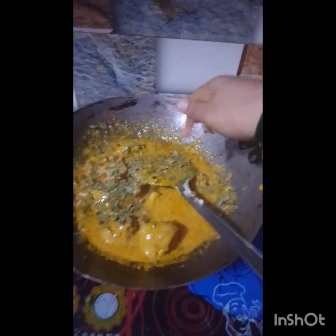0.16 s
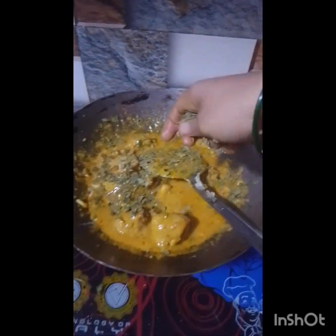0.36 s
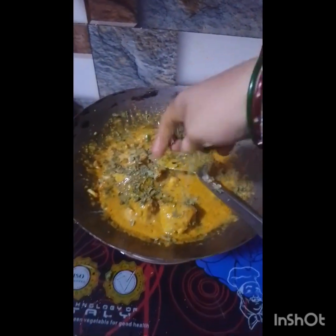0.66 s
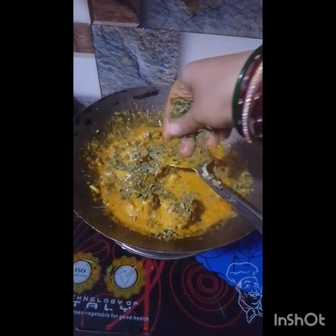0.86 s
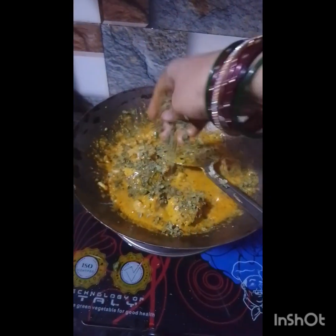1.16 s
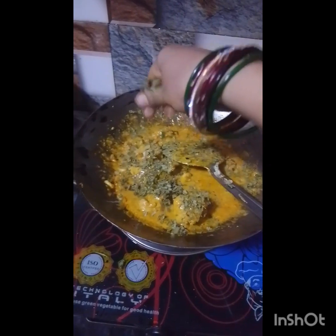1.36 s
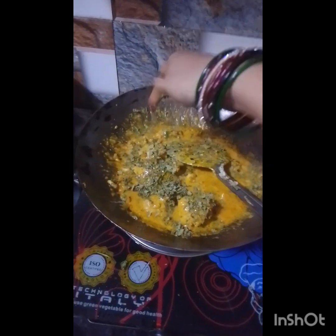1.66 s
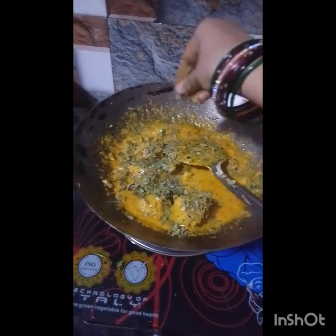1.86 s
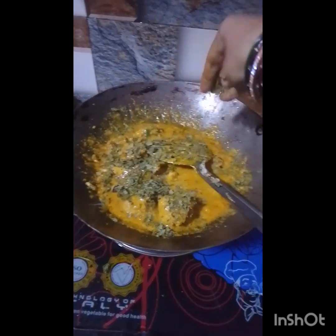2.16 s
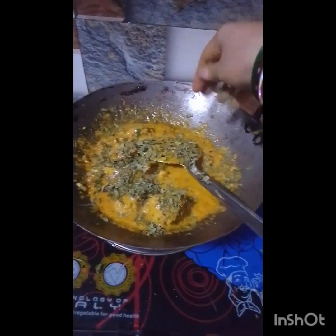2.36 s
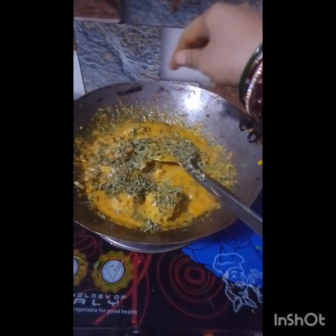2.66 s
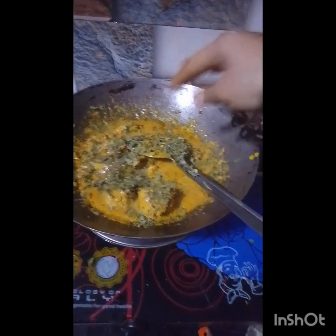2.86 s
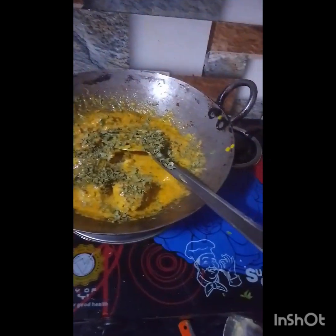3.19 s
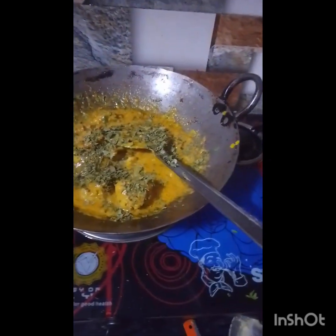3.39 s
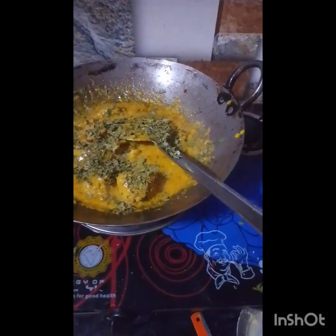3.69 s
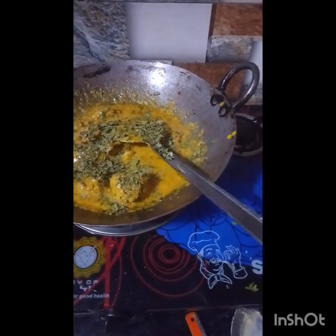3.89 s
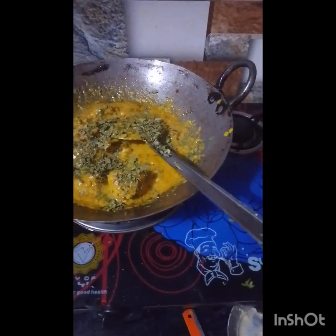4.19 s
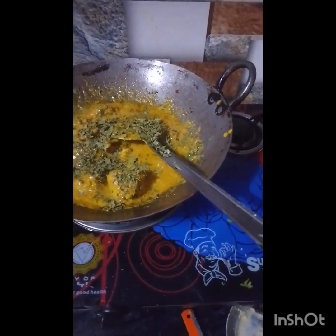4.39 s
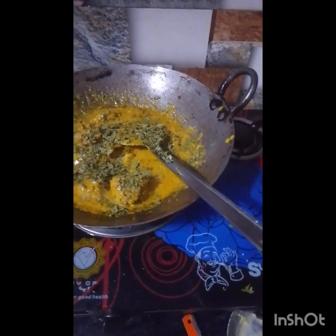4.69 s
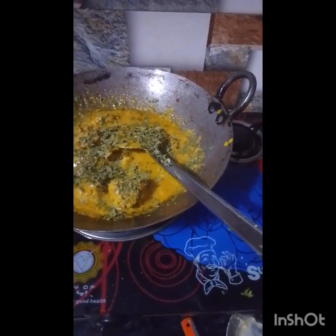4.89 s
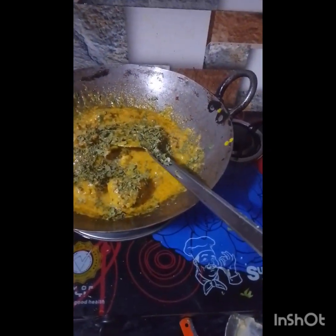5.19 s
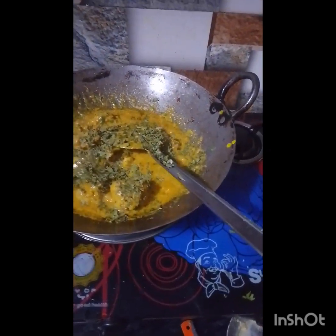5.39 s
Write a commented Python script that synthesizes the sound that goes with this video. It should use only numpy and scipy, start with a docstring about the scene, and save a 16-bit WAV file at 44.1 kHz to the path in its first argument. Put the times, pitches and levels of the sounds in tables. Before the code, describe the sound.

Heard close above the pan in a small tiled kitchen, with a short bright echo. Throughout, an induction cooktop's motor hums at about 83 and 166 hertz, the lower tone throbbing two or three times a second, the pitch sagging very slightly. Fan air rushes softly around it, mostly low and dull. Curry simmers with a very faint high sizzle, tiny crackles and several little pops each second. From 0 to about 2.5 seconds, dried herbs are crumbled in soft, dry, overlapping rustles. Bangles touch faintly at 2.1, slide with a brief bright rub near 2.9, and chink again around 3.05 and 3.5. Kitchenware clicks sharply at 3.6 to 3.7, then rattles in a quick cluster at 3.8 to 3.9. The loudest knock, a hard clack with a woody thud and short ring, lands at 4.17; a lesser one follows at 5.08. Hum and simmer continue to the end at 5.5.

```python
"""A motor hums in an induction cooktop: two strong tones and weaker lines locked to one drifting speed.
Around it a fan rushes (shaped noise), and a pan of curry sizzles (noise), crackles (tiny clicks)
and pops (short noise bursts). Dried herbs rustle (clumps of clicks), and the cook's bangles chink
(ringing tones and a rub of noise). Kitchenware knocks nearby with click, thud and ring,
in a small tiled kitchen made from fading noise."""
import sys
import numpy as np
from scipy import signal
from scipy.fft import rfft, irfft, next_fast_len
from scipy.io import wavfile
from scipy.ndimage import map_coordinates

SR = 44100
rng = np.random.default_rng(int(sys.argv[2]) if len(sys.argv) > 2 else 0)


def to_wav(s):
    """Save 16-bit WAV."""
    ch = np.atleast_2d(s).T  # columns
    pcm = np.round(np.clip(ch, -1, 1) * 32767)  # PCM
    wavfile.write(sys.argv[1], SR, pcm.astype(np.int16))


N = 244640  # length in samples

# the kitchen's echo, dying faster at high pitch: f/Hz, time to fall 60 dB/s
KITCHEN_DECAY = [(250, 0.45), (1200, 0.25), (3000, .23), (6000, 0.17), (12000, 0.15)]
# colour of the air through the fan: f/Hz, relative level/dB
AIR_COLOUR = [(25, -8), (55, -12), (78, 6), (102, -1.5), (122, 3), (155, 5), (195, -6), (400, -6),
              (700, -2.5), (950, -7.5), (1500, -6.5), (2500, -8.5), (3000, -12.5), (4500, -13.5),
              (6200, -27), (7400, -40.5)]
# resonances of the cooktop's housing: f/Hz, width/Hz, lift/dB
HOUSING_RESONANCES = [(303, 70, 12.5), (560, 104, 4), (4400, 750, 1.1)]
# colour of the fine sizzle at the pan's rim: f/Hz, relative level/dB
SIZZLE_COLOUR = [(3000, -20), (6000, -2.5), (8000, -4), (10000, 0.5), (11000, -3), (12200, -12),
                 (13200, -20), (15500, -28)]
# colour of the tiny bursts in the hot oil: f/Hz, relative level/dB
CRACKLE_COLOUR = [(800, -8), (2000, -2.5), (4300, 3), (6000, -13.5), (7500, -23.5), (10500, -27.5),
                  (13000, -54)]
# the largest bubbles bursting in the sauce: t/s, relative level/dB, f/Hz
LARGE_POPS = [(.435, -24, 2430), (.784, -26, 2480), (2.1066, -25.5, 4030), (3.3323, -22, 2440),
              (4.108, -24, 2700), (4.1472, -26, 2250)]
# colour of the rustling dry leaves: f/Hz, relative level/dB
LEAF_COLOUR = [(1500, -5), (4200, 11.5), (6000, 3.5), (7500, -6.5), (10000, -3), (11000, -7), (12200, -19),
               (13200, -17), (15500, -25)]
# pinches of dried herbs crumbled between the fingers: t of the crest/s, level/dB
HERB_PINCHES = [(.07, -54), (.26, -60), (.42, -54), (.82, -53), (.97, -58), (1.19, -53), (1.42, -57),
                (1.94, -59), (2.28, -55.5)]
# bangle touches: t/s, level/dB
BANGLE_TOUCHES = [(2.128, -55), (2.893, -48), (3.047, -56), (3.506, -49.5), (3.576, -54)]
# tones a bangle rings with: f/Hz, relative level/dB, time to fall 60 dB/s
BANGLE_MODES = [(4350, -2, .15), (4930, 1, 0.15), (8349, -8, 0.087), (9470, 2, 0.071), (9500, -13, 0.089),
                (12180, -22, .1), (13490, -19, .1), (15200, -20, .1)]
# colour of bangles rubbing: f/Hz, relative level/dB
RUB_COLOUR = [(8000, -31), (9500, -3), (10000, 4), (10700, -2), (11400, -21), (13000, -40)]
# kitchenware knocks: t/s, click level/dB, thud level/dB, ring level/dB
WARE_KNOCKS = [(3.621, -25, -51, -36), (3.6254, -25, -48, -29.5), (3.692, -35.5, -60, -41.5),
               (3.8191, -26.5, -53, -31), (3.834, -30, -58, -32.5), (3.861, -28, -58, -33),
               (3.872, -26, -62, -32), (4.1738, -18, -18.5, -29.5), (5.0798, -24.5, -27, -33)]
# tones the kitchenware rings with: f/Hz, relative level/dB, time to fall 60 dB/s
WARE_MODES = [(1024, -23, 0.11), (1378, 2.5, 0.053), (1600, -5, 0.12), (1936, -33, 0.099), (2180, -4, 0.15),
              (2585, 1.5, 0.1), (2730, -2, 0.069), (3270, -6, 0.17), (3503, -2, 0.12), (3810, -0.5, 0.064),
              (5560, -4, 0.079), (5960, -3, 0.048), (6230, -2, 0.043)]
# low tones of the struck counter: f/Hz, relative level/dB, time to fall 60 dB/s
COUNTER_MODES = [(264, 1, 0.092), (313, 1, 0.12), (352.3, 4, 0.12), (380, -12, 0.083), (468, -1.5, 0.11),
                 (536, -2.5, 0.13), (635, -3, 0.16), (722, -6, 0.2), (885, -6, 0.12), (1026, -13, 0.15),
                 (1250, -15, 0.22), (1384, -7, 0.25), (2000, -7, 0.12)]
# colour of the hard click: f/Hz, relative level/dB
CLICK_COLOUR = [(200, -13), (800, -6.5), (1400, -1), (2000, -5.5), (3000, 1), (4700, -8.5), (6200, -8),
                (7800, -22), (10500, -23), (12000, -35), (13000, -50), (15500, -52)]
# colour of the counter's thud: f/Hz, relative level/dB
THUD_COLOUR = [(120, -30), (210, -17), (260, -3), (340, 0), (450, -6), (680, -7), (900, -9), (1400, -3),
               (2100, -6), (3000, -13), (5000, -64)]
# the motor's turning rate: t/s, f/Hz
MOTOR_SPEED = [(0, 83.37), (1, 83.31), (2, 83.05), (3, 82.74), (4, 82.53), (5.55, 82.76)]
# slow swell of the two strong tones, before their quicker changes:
# t/s, first tone level/dB, second tone level/dB
HUM_SWELL = [(0, -39.5, -34), (.6, -40, -36), (.73, -46.5, -36), (.88, -36, -35.5), (1.15, -35.5, -34.5),
             (1.45, -37.5, -36), (1.95, -36, -37.5), (2.3, -39.5, -34.5), (3.2, -39, -35), (3.55, -36, -34),
             (4.2, -37.5, -33), (4.85, -36, -35.5), (5.05, -42, -32.5), (5.3, -36.5, -33),
             (5.55, -38.5, -36)]
# throbbing of the first tone: f of the beat/Hz, depth/dB, t of a crest/s
HUM_BEATS = [(2.08, 1.5, 0.53), (3.06, 1.46, 0.555)]
# weaker motor lines, level before wavering: multiple of the turning rate, level/dB
MOTOR_LINES = [(1.483, -52.5), (1.733, -56.5), (3, -52), (3.5, -59.5), (5.217, -61.5), (7, -56)]

FAN_DB, SIZZLE_DB, CRACKLE_DB = -39, -72, -54  # middle levels; crackle before its echo
SMALL_POP_RATE = 4.8  # bubbles a second
SMALL_POP_DB = -33  # middle level on the same relative scale as the large pops
SMALL_POP_HZ, SMALL_POP_OCTAVES = 2640, 0.54  # middle pitch, spread either way
PINCH_RISE_S, PINCH_RELEASE_S = 0.42, 0.63  # time to rise or fall by 60 dB
SLIDE_S, SLIDE_DB = 2.864, -47  # one slide of the bangles down the wrist
REBOUND_S, REBOUND_DB = 0.015, -2  # delay and change of level
SCRAPE_DB = -12  # rub within a touch, relative to its ring
SETTLE_S = 0.0045  # delay from a piece's edge landing to its settling flat
SETTLE_CLICK_DB, SETTLE_THUD_DB, SETTLE_RING_DB = -6.5, 3, 4  # changes of level
TOP_HZ, OFFSET = 15500, 0.0067  # upper band limit, steady shift of the waveform


def amp(db):
    """Turn decibels into gain."""
    return 10 ** (np.asarray(db) / 20)


def unit(x):
    """Scale to an rms (average strength) of 1."""
    return x / np.sqrt(np.mean(x ** 2) + 1e-20)


def along(points, hz):
    """Read (frequency, value) points on a log frequency axis."""
    f, v = np.transpose(points)
    return np.interp(np.log(hz + 1), np.log(f + 1), v)


def curves(rows):
    """Draw one value per sample for each column after the time."""
    s, *cols = np.transpose(rows)
    return [np.interp(np.arange(N) / SR, s, c) for c in cols]


def wobble(rate):
    """Draw a smooth random curve through `rate` random points a second."""
    knots = np.random.default_rng(rng.integers(2 ** 31)).standard_normal(int(N * rate / SR) + 4)
    return map_coordinates(knots, [np.arange(N) * rate / SR])


def filtered(x, gain):
    """Pass x through a gain that depends on frequency."""
    m = next_fast_len(len(x) + 8192)  # spare room for the filter's tail
    return irfft(rfft(x, m) * gain(np.fft.rfftfreq(m, 1 / SR)), m)[:len(x)]


def noise(spectrum, size):
    """Make coloured noise of rms 1."""
    return unit(filtered(rng.standard_normal(size), lambda hz: amp(along(spectrum, hz))))


def fade(t, t60):
    """Decay by 60 dB in t60 seconds."""
    return np.exp(-np.log(1000) * t / t60)


def burst(spectrum, t, t60):
    """Make a dying puff of coloured noise; its colour filter never sounds ahead of the puff."""
    m = 2 * len(t)
    # the log spectrum folded forward in time gives a minimum-phase filter
    cepstrum = irfft(np.log(amp(along(spectrum, np.fft.rfftfreq(m, 1 / SR)))), m)
    cepstrum[0] = 0
    colour = irfft(np.exp(rfft(2 * cepstrum[:len(t)], m)), m)[:len(t)]
    colour /= np.linalg.norm(colour)
    puff = rng.standard_normal(len(t)) * fade(t, t60)
    return signal.fftconvolve(puff, colour)[:len(t)]


def ticks(rate, scatter_db):
    """Scatter random clicks of uneven size, on average `rate` a second."""
    hits = rng.random(N) < rate / SR
    return hits * rng.standard_normal(N) * amp(scatter_db * rng.standard_normal(N))


def ring(modes, t, scatter_db):
    """Sum fading tones of a struck object, each hit at a slightly new strength."""
    hz, db, t60 = np.transpose(modes)[:, :, None]
    size = amp(db + scatter_db * rng.standard_normal(db.shape))
    phase = 2 * np.pi * (hz * t + rng.random(hz.shape))
    rise = 1 - np.exp(-(hz * t) ** 2)  # each tone swells over its first cycle
    tones = size * np.sin(phase) * rise * fade(t, t60)
    return np.sum(tones, axis=0) / np.linalg.norm(size)


def add(track, s, sound):
    """Mix a sound into a track at s seconds."""
    part = track[max(round(s * SR), 0):][:len(sound)]
    part += sound[:len(part)]


def kitchen(x, wet_db):
    """Add the dense echo of close tiled walls: noise that dies faster at high pitch."""
    hz, t, z = signal.stft(rng.standard_normal(SR // 3), SR, nperseg=256)
    decay = fade(t, along(KITCHEN_DECAY, hz)[:, None])
    tail = signal.istft(z * decay, SR, nperseg=256)[1]
    tail = np.pad(tail / np.linalg.norm(tail), (SR // 400, 0))  # echo starts 2.5 ms late
    return x + amp(wet_db) * signal.fftconvolve(x, tail)[:len(x)]


def fan():
    """Rushing, turbulent air is noise, made stronger at the housing's resonances."""
    def housing_gain(hz):
        lift_db = sum(db / (1 + (2 * (hz - centre) / width) ** 2)
                      for centre, width, db in HOUSING_RESONANCES)
        roll_off = 1 / (1 + (hz / 8000) ** 12)
        return amp(lift_db) * roll_off

    air = unit(filtered(noise(AIR_COLOUR, size=N), housing_gain))
    return amp(FAN_DB + 0.4 * wobble(25)) * air


def small_pops():
    """Small bubbles burst at random times, sizes and pitches: rows of t/s, relative level/dB, f/Hz."""
    count = round(SMALL_POP_RATE * N / SR)
    when, size, pitch = np.random.default_rng(rng.integers(2 ** 31)).random((count, 3)).T
    level_db = SMALL_POP_DB + 3 * (2 * size - 1)
    pitch_hz = SMALL_POP_HZ * 2 ** (SMALL_POP_OCTAVES * (2 * pitch - 1))
    return list(zip(when * N / SR, level_db, pitch_hz))


def simmer(pop_db=-9, pop_t60=0.022):
    """Sauce gives a gently surging sizzle, tiny oil crackles and short pops from bursting bubbles."""
    surge_db = 1 * wobble(4.07) + 0.89 * wobble(60)
    sizzle = amp(SIZZLE_DB + surge_db) * noise(SIZZLE_COLOUR, size=N)
    tiny_bursts = ticks(300, scatter_db=3)
    crackle = unit(filtered(tiny_bursts, lambda hz: amp(along(CRACKLE_COLOUR, hz))))
    bubbling = amp(CRACKLE_DB) * crackle
    t = np.arange(SR // 10) / SR
    for s, db, hz in list(LARGE_POPS) + small_pops():
        # the bubble's film colours its pop most strongly near its pitch
        film = [(hz / 3, -22), (hz / 1.0, -6), (hz, 0), (hz * 1.17, -7), (hz * 2, -30), (hz * 4, -62)]
        add(bubbling, s, amp(db + pop_db) * burst(film, t, pop_t60))
    return sizzle + kitchen(bubbling, wet_db=0)


def herbs():
    """With each pinch, dry leaves snap in clumps of tiny clicks until the fingers let go."""
    snaps = ticks(900, scatter_db=1) * amp(2.5 * wobble(44.7))
    leaves = filtered(snaps, lambda hz: amp(along(LEAF_COLOUR, hz)))
    rustle = unit(kitchen(leaves, wet_db=-0.5))
    t = np.arange(N) / SR
    pressure = np.zeros(N)
    for s, db in HERB_PINCHES:
        t60 = np.where(t < s, PINCH_RISE_S, PINCH_RELEASE_S)
        pressure += amp(db) * fade(np.abs(t - s), t60)
    return pressure * rustle


def bangles(rub_t60=0.041):
    """Bangles touch, ring and rebound once per touch; one slide among the touches is a rub of noise."""
    out, t = np.zeros(N), np.arange(SR // 3) / SR
    slide = amp(SLIDE_DB) * burst(RUB_COLOUR, t, rub_t60)
    add(out, SLIDE_S, kitchen(slide, wet_db=-2))
    for s, ring_db in BANGLE_TOUCHES:
        for delay, db in [(0, ring_db), (REBOUND_S, ring_db + REBOUND_DB)]:
            rub = amp(SCRAPE_DB) * burst(RUB_COLOUR, t, rub_t60)
            swell = 1 - fade(t, 0.0054)  # a glancing touch swells in
            chink = ring(BANGLE_MODES, t, scatter_db=1) * swell
            add(out, s + delay, kitchen(amp(db) * (rub + chink), wet_db=-9))
    return out


def contact(click_db, thud_db, ring_db):
    """One contact makes a hard click, rings the ware and shakes the counter into a thud."""
    t = np.arange(SR // 2) / SR
    click = amp(click_db) * burst(CLICK_COLOUR, t, t60=0.024)
    thud = amp(thud_db - 5) * burst(THUD_COLOUR, t, t60=0.042)  # noise 5 dB under the thud level
    counter = amp(thud_db) * ring(COUNTER_MODES, t, scatter_db=1)
    ware = amp(ring_db) * ring(WARE_MODES, t, scatter_db=1.5)
    return kitchen(click + thud, wet_db=-1) + kitchen(ware, wet_db=-6) + counter


def kitchenware():
    """Each piece lands on its edge, then settles flat with less click and more thud and ring."""
    out = np.zeros(N)
    for s, click_db, thud_db, ring_db in WARE_KNOCKS:
        edge = contact(click_db, thud_db, ring_db)
        add(out, s, edge)
        flat = contact(click_db + SETTLE_CLICK_DB, thud_db + SETTLE_THUD_DB, ring_db + SETTLE_RING_DB)
        add(out, s + SETTLE_S, flat)
    return out


def motor():
    """One drifting shaft drives all the tones; the first throbs and the weaker lines waver."""
    t = np.arange(N) / SR
    turn = 2 * np.pi * np.cumsum(curves(MOTOR_SPEED)[0]) / SR  # shaft angle in radians
    first_db, second_db = curves(HUM_SWELL)
    for hz, depth_db, crest in HUM_BEATS:
        first_db = first_db + depth_db * np.cos(2 * np.pi * hz * (t - crest))
    first_db = first_db + 1 * wobble(11)
    second_db = second_db + 0.68 * wobble(23.9)
    # the small wobbles inside each cosine shift its phase, in radians
    hum = amp(first_db) * np.cos(turn + 2 * 0.049 * wobble(1.9))
    hum += amp(second_db) * np.cos(2 * turn + 0.049 * wobble(16))
    for multiple, db in MOTOR_LINES:
        hum += amp(db + 1.9 * wobble(6)) * np.cos(multiple * turn + 0.14 * wobble(10))
    return np.sqrt(2) * hum  # makes the levels rms levels


def scene():
    """Mix everything heard from just above the pan."""
    background = fan() + simmer()
    handling = herbs() + bangles() + kitchenware()
    return (background + handling + motor())[None]


def record(dry):
    """Remove everything from the band limit up, then add a small steady offset."""
    return filtered(dry[0], lambda hz: hz < TOP_HZ)[None] + OFFSET


dry = scene()
out = record(dry)
to_wav(out)
```